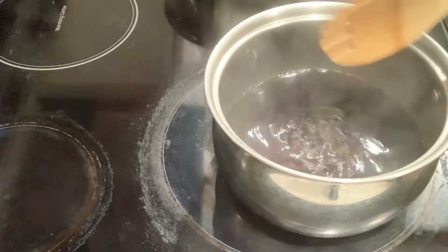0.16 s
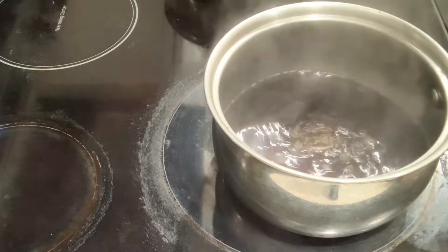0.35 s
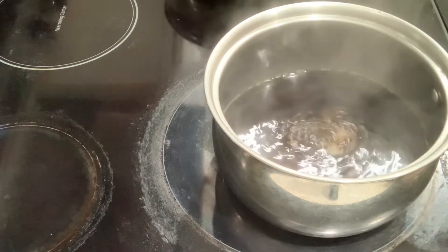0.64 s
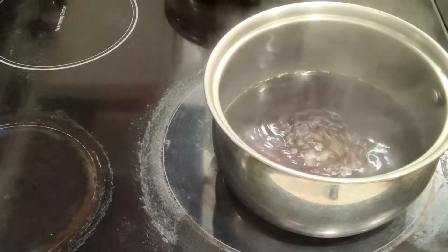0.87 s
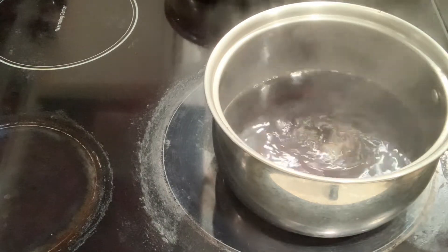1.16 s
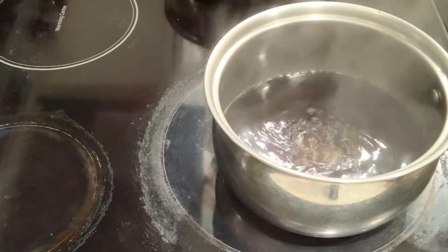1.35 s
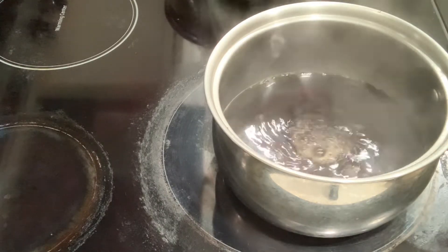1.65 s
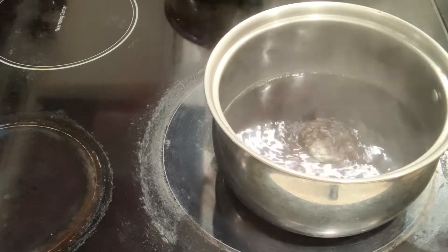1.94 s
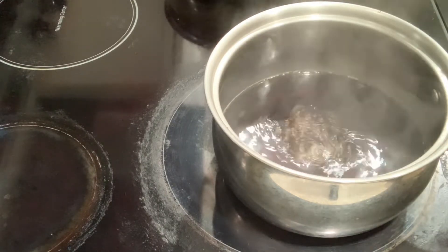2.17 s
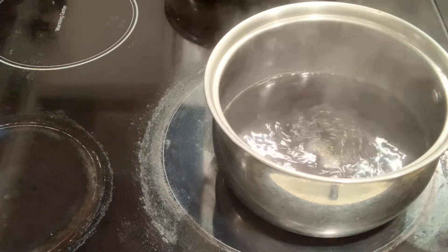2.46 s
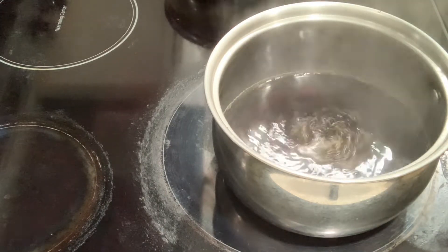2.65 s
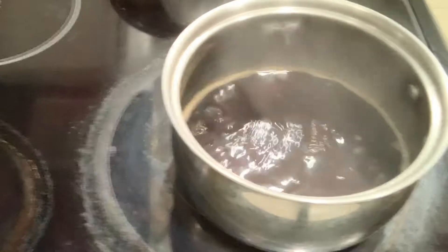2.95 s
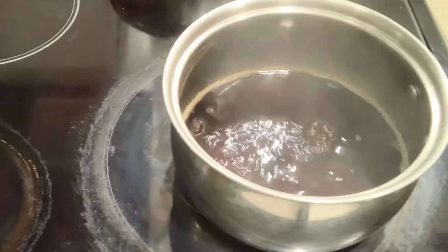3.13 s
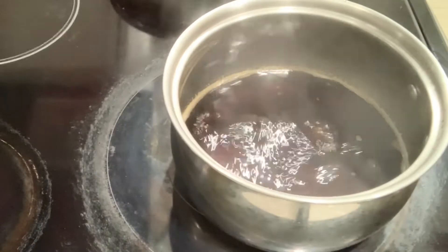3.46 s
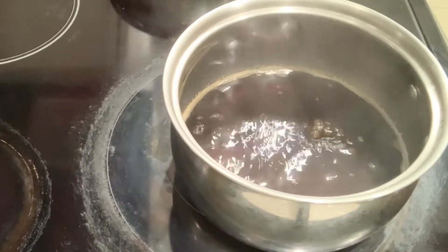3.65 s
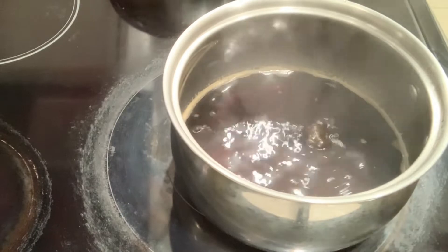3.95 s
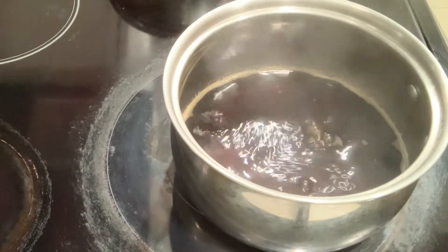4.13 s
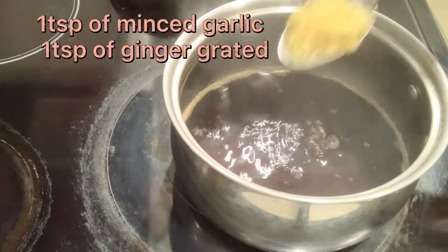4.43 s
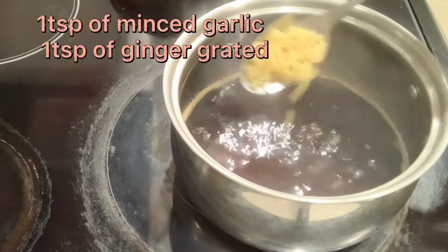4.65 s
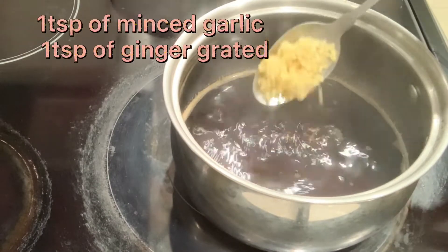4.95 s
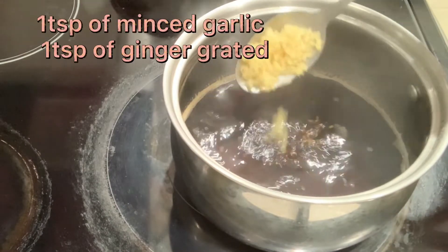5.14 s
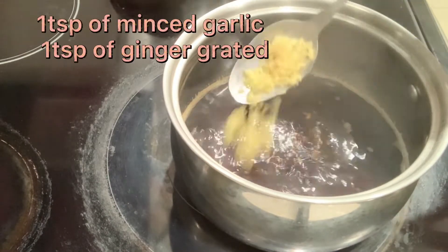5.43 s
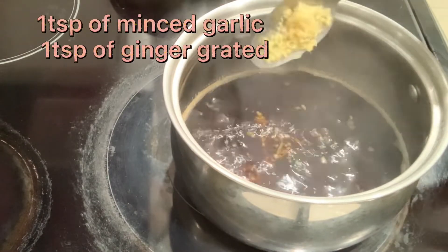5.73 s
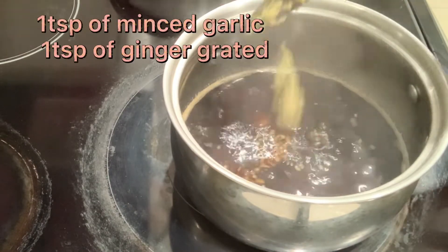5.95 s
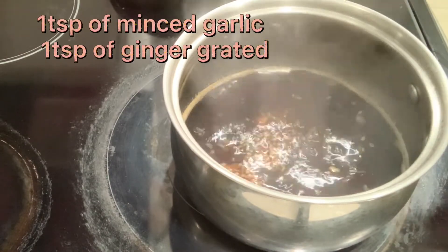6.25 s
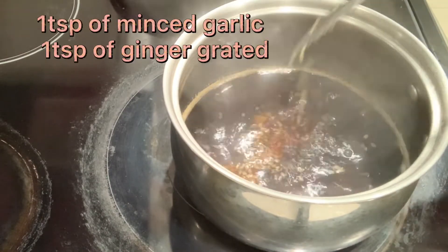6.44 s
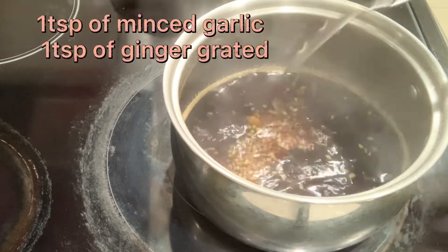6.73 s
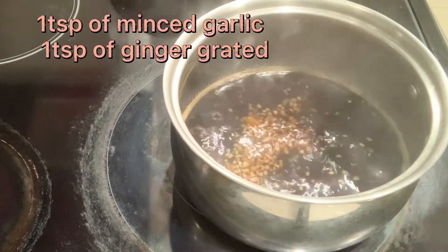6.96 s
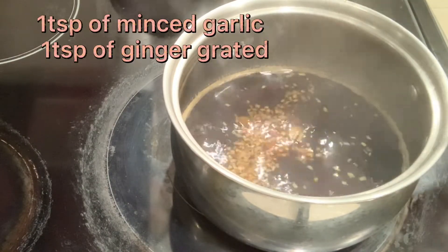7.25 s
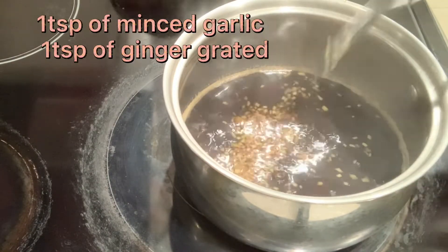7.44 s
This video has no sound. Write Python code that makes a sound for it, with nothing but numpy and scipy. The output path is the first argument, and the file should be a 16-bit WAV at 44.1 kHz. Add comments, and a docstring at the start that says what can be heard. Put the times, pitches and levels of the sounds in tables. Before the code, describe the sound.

In a dry indoor kitchen, a pan simmers close to the microphones, low rumble and hum beneath. Small pops open the scene, then a single thud and a quick cluster of utensil knocks. The sound cuts out for an instant and resumes fuller, with brighter bubbling and a delicate high chirr. Later, portions falling into the hot liquid make sharp ticks, droplet spray and brief hissing bursts.

```python
"""Sauce simmering on a hob

Thin sauce simmers in a steel saucepan while a kitchen fan drones and the mains hums: wavering sines over
coloured noise. Bubbles are ringing clicks, spits are short noise bursts and fizz is a dense swarm of clicks.
A utensil is knocked and set down nearby: struck resonances over a dull thud. After a short silence the same
kitchen returns with louder, recoloured air and a thin chirr, as minced spice drops in from a spoon."""
import sys
import numpy as np
from scipy import signal
from scipy.fft import rfft, irfft, next_fast_len
from scipy.io import wavfile
from scipy.ndimage import uniform_filter1d

SR = 44100
rng = np.random.default_rng(int(sys.argv[2]) if len(sys.argv) > 2 else 0)


def to_wav(sig):
    """Store sig (one row per channel, or 1-D mono) as 16-bit WAV at the path in sys.argv[1].

    Samples outside -1..1 are clipped; the rate is SR.
    """
    pcm = np.clip(np.atleast_2d(sig), -1, 1) * 32767
    pcm = np.round(pcm).astype(np.int16)
    wavfile.write(sys.argv[1], SR, pcm.T)  # frames by channels


N = 335054

# silent gap: (start [s], end [s])
GAP = (2.8507, 2.915)
# kitchen air: (time [s], deep rumble [dB], air rush [dB])
AIR_LEVELS = [(0.0, -51, -60.5), (0.4, -55, -61.5), (1.27, -52.5, -60), (1.6, -56, -62.5),
              (1.85, -53.5, -59.5), (2.84, -56, -61.5), (2.94, -45.5, -52.5), (3.11, -44, -52.5),
              (3.4, -45, -53.5), (4.2, -43.5, -53.5), (6.0, -45, -53), (7.6, -43.5, -53.5)]
# colours of rumble and rush before and after the gap: (frequency [Hz], density [dB per Hz, relative])
RUMBLE_BEFORE = [(13, -61), (22, -34), (41, -8.5), (59, 4.5), (70, 0.5), (85, -8.5), (99, -7.5), (118, 2),
                 (146, -2), (236, -15), (255, -41), (300, -16.5), (390, -43), (660, -120)]
RUMBLE_AFTER = [(13, -76), (22, -37), (27, -34), (30, -11), (39, -12), (59, -0.5), (85, 4.5), (113, -9),
                (124, 1), (146, -11), (194, -7), (221, -27), (249, -38.5), (300, -27), (390, -44),
                (660, -120)]
RUSH_BEFORE = [(130, -3), (220, -4), (361, -4.5), (388, -10), (428, -2), (610, -10.5), (765, -4),
               (907, -23.5), (1110, -13.5), (1240, -22), (1530, -12), (2210, -73), (2450, -24.5),
               (4970, -24), (6500, -33), (8450, -83), (14300, -120)]
RUSH_AFTER = [(130, -26), (220, -2.5), (253, -9.5), (305, 1), (351, -1), (610, -9), (857, -10.5),
              (960, -11.5), (1050, -12.5), (1720, -12), (2210, -17.5), (2450, -22), (2780, -23.5),
              (3480, -23.5), (6500, -36), (8450, -60), (14300, -120)]
# colour of the steady high hiss: (frequency [Hz], density [dB per Hz, relative])
HISS_COLOUR = [(4000, -2), (6000, -2), (8000, -12), (11000, 8.5), (14000, 10), (15600, -11), (15900, 4)]
# level of the steady high hiss: (before the gap [dB], after it [dB])
HISS_LEVELS = (-87.5, -85)
# patchiness of the rush: (spread before the gap [dB], after it [dB])
PATCH_SPREADS = (2.0, 1.1)
# resonances of the pan and the hob around it: (frequency [Hz], width [Hz], gain [dB])
PAN_RESONANCES = [(183, 68, 1.5), (351, 27.2, 3.5), (432.5, 35, 5), (844, 44, 2.5), (918, 47, 9),
                  (1150, 144, 5), (2400, 80, 8), (982, 30, 2), (3500, 40, 6.5), (4980, 33, 10),
                  (6060, 64, 6), (9100, 110, 7.5)]
# thin whine: (frequency [Hz], level before the gap [dB], level after it [dB])
WHINE = [(993, -100, -70.5)]
# fan drone, drifting in pitch and swelling unevenly: (time [s], pitch [Hz], level [dB])
FAN_DRONE = [(0.0, 120.7, -70), (1.37, 121.9, -52.5), (1.6, 118.2, -81), (1.72, 116.2, -47),
             (2.16, 115.8, -56.5), (2.54, 110.2, -52.5), (2.84, 109, -47), (2.94, 109.3, -39.5),
             (3.15, 109.8, -45), (3.8, 111.8, -56), (4.17, 110.5, -42.5), (4.95, 109, -84),
             (5.37, 110, -57), (5.65, 111.8, -39), (5.9, 112.8, -60.5), (6.07, 111, -47), (6.6, 112, -44.5),
             (6.77, 112.8, -73), (6.9, 110.2, -43), (7.3, 110.1, -54), (7.6, 111.3, -44.5)]
# lowest hum, one list before the gap and one after: (time [s], pitch [Hz], level [dB])
LOW_HUM = [
    [(0.0, 59.9, -51.5), (0.88, 59.9, -59.5), (0.92, 59.9, -47), (1.59, 59.9, -55), (1.63, 60.1, -60),
     (1.7, 59.9, -51.5), (1.88, 65.4, -54), (1.97, 63.1, -59), (2.03, 59.9, -44), (2.15, 60.0, -59),
     (2.24, 59.9, -47), (2.85, 59.9, -59)],
    [(2.93, 58.6, -46), (2.98, 58.6, -63), (3.07, 59.9, -55), (4.16, 59.9, -44), (6.48, 59.9, -46),
     (6.58, 59.9, -58), (6.76, 60.0, -40.5), (6.87, 59.9, -54), (6.91, 59.9, -44.5), (7.27, 59.9, -46),
     (7.39, 60.0, -45), (7.6, 58.7, -56)],
]
# narrow bands of the chirr: (frequency [Hz], width [Hz], gain [dB])
CHIRR_BANDS = [(7120, 650, 3.5), (9000, 52, 2), (9500, 600, -2), (10046, 360, 3.5), (10440, 190, -0.5)]
# utensil knocks: (time [s], first blow over rattle [dB], thud [dB], ringing [dB], rattle rise [s],
# rattle length [s], fall by 60 dB [s], upper band edge [Hz], longest ring when held [s])
KNOCKS = [(1.034, 26.5, -45, -72.5, .001, 0.0074, 0.17, 1870, 0.025),
          (1.243, 13.5, -50, -61, .007, 0.012, 0.13, 4700, 0.5),
          (1.2605, 25, -59, -70, 0.0011, 0.007, 0.16, 4700, .3),
          (1.283, 22, -49.5, -67.5, 0.0018, 0.018, 0.1, 4500, 0.3),
          (1.315, 10, -52.5, -79, 0.0023, .025, 0.5, 4160, .03)]
# ringing modes of the utensil: (frequency [Hz], level [dB], 60 dB decay [s])
UTENSIL_MODES = [(193, 0, 0.081), (333, -6, 0.04), (454, -12, 0.27), (548, -8.5, 0.053), (895, -3, 0.05),
                 (1013, -1, 0.03), (1207, -8, 0.045), (1370, -5, 0.04), (1537, -3.5, 0.065),
                 (1460, -35, 0.54), (1613, -8, 0.03), (2063, -10, 0.022), (2340, -11, 0.02),
                 (2630, -8.5, 0.019), (3310, -5, 0.03), (3800, -21, .018), (4460, -18, 0.025)]
# levels of the knocks by path: (direct [dB], scattered [dB])
KNOCK_PATHS = (-7.5, -2.5)
# steady surface fizz: (time [s], fine fizz [dB], coarse fizz [dB])
FIZZ_LEVELS = [(0.0, -79.5, -71), (1.0, -79.5, -68.5), (2.84, -80.5, -77.5), (2.92, -79, -65),
               (5.0, -79.5, -69), (7.6, -82.5, -71.5)]
# colours of fine fizz, coarse fizz and splashes: (frequency [Hz], density [dB per Hz, relative])
FINE_COLOUR = [(3000, -32), (5000, -22), (7000, -26), (8500, 3.5), (10500, 9), (12500, 0.5), (14300, 8),
               (15650, -25), (15950, -14)]
COARSE_COLOUR = [(700, -3.5), (1400, 4.5), (2500, 3.5), (5000, -1), (7000, -2.5), (10000, -48),
                 (16000, -39)]
SPLASH_COLOUR = [(2800, -30), (4000, 4.5), (5500, 2.5), (7000, 5.5), (8500, -13)]
# flare-ups where drops and spice meet the sauce: (time [s], rise [s], hold [s], fall [dB per s],
# fine fizz [dB], coarse fizz [dB], splash [dB])
FLARES = [(0.009, 0.0033, 0.021, 214, -75, -62.5, -77), (0.756, 0.027, 0.0091, 148, -64, -58, -65.5),
          (1.014, .006, 0.0034, 359, -104, -105, -92), (1.588, 0.0058, 0.0066, 364, -79, -80, -81),
          (2.787, 0.0097, 0.016, 360, -83, -88, -84), (4.742, 0.0069, 0.032, 364, -69, -70, -75),
          (4.815, 0.018, 0.013, 364, -74, -70, -82), (5.025, 0.0055, 0.0071, 364, -71, -78, -88),
          (5.45, 0.027, 0.013, 364, -63.5, -80, -69), (5.858, 0.0067, 0.009, 364, -72, -80, -83),
          (5.947, 0.0022, 0.028, 402, -63, -88, -62.5), (6.345, 0.003, 0.021, 402, -59, -62, -69),
          (6.694, .006, 0.0087, 364, -89, -91, -90)]
# spitting sauce: (time [s], peak before band filter [dB], lowest [Hz], highest [Hz])
TICKS = [(5.9495, -31.5, 3500, 20000), (6.6, -59, 3500, 8000), (6.2924, -40.5, 3500, 7100),
         (6.336, -49, 9000, 17400), (4.8, -43, 2100, 10000), (7.1, -51, 3000, 6100),
         (6.369, -53, 4000, 15000), (5.0395, -39, 2200, 4300), (4.7025, -35, 2200, 7900),
         (4.2, -42.5, 3000, 8000), (3.7, -44, 2700, 4600), (1.341, -41, 4200, 6500), (4.6, -48, 2800, 8800)]
# bursting bubbles at set times, loud and faint: (time [s], ring peak [dB], pitch [Hz],
# spray before band filter [dB])
TIMED_POPS = [(0.03, -44, 4440, -60), (0.0295, -44.5, 1870, -78), (0.037, -46, 2230, -75),
              (0.038, -42, 4200, -70), (0.047, -43, 2040, -75), (0.054, -41, 4300, -65),
              (0.069, -46, 2050, -75), (0.098, -48, 3870, -55), (0.331, -52, 3840, -59),
              (0.5566, -48, 3830, -56), (0.68, -54, 5930, -47), (0.165, -70, 5000, -73),
              (0.255, -70, 5000, -71), (0.629, -59, 5000, -53), (0.692, -65, 5000, -55),
              (0.781, -47, 5100, -62), (0.788, -41, 5360, -60), (0.796, -47, 5600, -65),
              (0.781, -48, 2100, -75), (0.8, -42.5, 1400, -75), (0.815, -49, 1380, -75),
              (1.0185, -49, 4000, -53), (1.341, -45, 5430, -84), (1.6075, -51, 4930, -53),
              (1.8893, -63, 4000, -50.5), (1.9101, -59, 3860, -55), (1.973, -53.5, 3980, -57),
              (2.0, -55, 3300, -75), (2.0817, -48, 6060, -55), (2.116, -50, 3500, -75),
              (2.355, -48.5, 2850, -75), (2.432, -53, 3740, -75), (2.458, -51, 3400, -75),
              (2.812, -49, 3400, -77), (2.588, -64, 5120, -53), (2.6341, -68, 4010, -50.5),
              (2.7725, -54, 5024, -55), (2.796, -54, 4800, -52), (3.1532, -41, 4840, -53),
              (3.6366, -41, 4880, -57), (3.6801, -46, 3770, -53), (4.2804, -41, 5850, -65),
              (4.703, -48, 3200, -49), (4.7516, -57, 3960, -41.5), (4.767, -42, 5860, -51),
              (4.816, -43, 4000, -70), (4.8574, -43.5, 4020, -65), (4.8615, -60, 4020, -46),
              (4.826, -64, 4000, -58), (5.0345, -59, 4000, -46.5), (5.0388, -39, 3030, -50),
              (5.047, -62, 4000, -58), (5.1372, -45, 6200, -66), (5.469, -44, 5590, -53),
              (5.869, -60, 3710, -51), (5.9494, -42, 4844, -37), (5.9529, -43, 5653, -46),
              (5.981, -41, 5000, -56), (6.0911, -49, 4015, -71), (6.29, -58, 3623, -74),
              (6.3543, -33, 5050, -39), (6.368, -60, 5060, -34.5), (6.4028, -45, 6390, -64),
              (6.573, -57, 3944, -58), (6.703, -60, 4300, -57), (7.3422, -66, 3625, -58),
              (7.3744, -56, 4304, -59), (7.481, -58, 4290, -50)]
# random smaller bursts: (ring peak [dB], spray [dB], spread either way [dB], lowest [Hz], highest [Hz])
SMALL_POPS = (-53.5, -69.5, 3.5, 2310, 5502)
# microphone pair: (frequency [Hz], share heard alike [0-1], lag of left [radians], left over right [dB])
MIC_PAIR = [(30.5, .99, 0.6, 3), (66, 1, -0.5, -1), (120.6, 1, 0, 5), (273, 0.5, 0, -0.5),
            (440, 0.3, .8, 0), (650, .3, 2.3, 0), (874, 0.3, 2.8, 0), (1800, 0.27, 3, 1.5),
            (2470, 0.17, 5, 1), (5700, 0.17, 8, 1.2), (6710, 0.98, 8, 2.5), (8000, 1, 9.5, -4),
            (9040, 1, 9.5, 2.5), (10330, 0.62, 11, -1), (11050, 0.88, 13.2, .3), (12400, 1, 12.2, 0),
            (14200, 0.85, 13.8, -0.5)]

WHINE_WAVER_DB = 1.5
CHIRR_START_S, CHIRR_GAP_S, CHIRR_SLOWING_S = 2.93, .104, 0.000368  # slowing: added to each gap
CHIRR_DB, CHIRR_FADE_DB_PER_S = -65, 2.5
CHIRR_SPREAD_DB, CHIRR_JITTER_S = 1.5, .004
GRIP_DETUNE = .01  # each blow finds the rings at slightly other pitches (share of the pitch)
TICK_S, SPRAY_S = 0.0037, 0.011  # time to fall 60 dB
POP_CYCLES, SMALL_POP_CYCLES = 16.7, 31  # cycles to fall 60 dB; the random bursts ring on
SMALL_POPS_BEFORE_DB = -7  # added to their ring before the gap
ROOM_T60_S = 0.069
CUTOFF_HZ = 16500

T = np.arange(N) / SR
AFTER = T > GAP[1]
SIZE = next_fast_len(N + SR)
HZ = np.maximum(np.arange(SIZE // 2 + 1) * SR / SIZE, 1)


def amp(db):
    """Decibels to gain."""
    return 10 ** (np.asarray(db) / 20)


def rms_one(x):
    """Scale to rms 1."""
    return x / np.sqrt(np.mean(x ** 2) + 1e-20)


def in_time(rows):
    """Columns of a curve table at every sample."""
    s, *columns = np.transpose(rows)
    return [np.interp(T, s, c) for c in columns]


def over_hz(rows):
    """Columns of a frequency table at every spectral line, on a log frequency axis."""
    hz, *columns = np.transpose(rows)
    return [np.interp(np.log(HZ), np.log(hz), c) for c in columns]


def colour_gain(rows):
    """Gain of a colour table at every spectral line."""
    return amp(over_hz(rows)[0])


def coloured(x, gain):
    """Filter by a gain for each spectral line."""
    return irfft(rfft(x, SIZE) * gain, SIZE)[..., :N]


def band(x, order, low_hz, high_hz):
    """Keep one band of frequencies."""
    return signal.sosfilt(signal.butter(order, [low_hz, high_hz], "band", fs=SR, output="sos"), x)


def drift(rate):
    """Slow random wander of spread 1: noise smoothed by a double pole at the rate in Hz."""
    r = np.exp(-80 * np.pi * rate / SR)  # runs at one point per 40 samples
    noise = rng.standard_normal(N // 40 + 2002)
    slow = signal.lfilter([1], [1, -2 * r, r * r], noise)[2000:]  # drop the settling
    return np.interp(np.arange(N) / 40, np.arange(len(slow)), rms_one(slow))


def ring(clicks, hz, t60):
    """A two-pole resonator: each unit click starts a sine decaying from about height 1."""
    r, w = amp(-60 / (t60 * SR)), 2 * np.pi * hz / SR
    return signal.lfilter([0, np.sin(w)], [1, -2 * r * np.cos(w), r * r], clicks + 1e-18)


def grains(per_s, spread_db, shape=N):
    """Random clicks of either sign, most small and a few large."""
    sizes = amp(spread_db * np.minimum(rng.exponential(1, shape), 5))
    signs = rng.choice([-1, 1], shape)
    return sizes * signs * (rng.random(shape) < per_s / SR)


def hollows():
    """Pan and hob resonances multiply into one gain for every spectral line."""
    peaks = [amp(db / (1 + (2 * (HZ - hz) / width) ** 2)) for hz, width, db in PAN_RESONANCES]
    return np.prod(peaks, axis=0)


def two_colours(x, before, after, extra=1):
    """One colour before the gap, another after; each is levelled to rms 1 over the whole length."""
    first, second = (rms_one(coloured(x, extra * colour_gain(c))) for c in (before, after))
    return np.where(AFTER, second, first)


def patchy(x, depth_db, rate):
    """Eddies: overlapping half-octave bands swell and sink each at its own pace."""
    place = 2 * np.log2(np.clip(HZ, 250, 8000) / 250)  # half octaves above 250 Hz
    spectrum = rfft(x, SIZE)
    out = 0
    for k in range(11):
        weight = np.maximum(1 - np.abs(place - k), 0)
        out = out + amp(depth_db * drift(rate)) * irfft(spectrum * weight, SIZE)[..., :N]
    return out


def kitchen_air():
    """Turbulent rumble, a rush of air with the simmer's patter in it, and a steady high hiss; three paths."""
    rumble_db, rush_db = in_time(AIR_LEVELS)
    white = rng.standard_normal((3, N))
    rumble = amp(rumble_db) * two_colours(white, RUMBLE_BEFORE, RUMBLE_AFTER)
    patter = rms_one(grains(per_s=2500, spread_db=4.0, shape=(3, N)))
    # the noise is reversed in time so that rush and rumble do not move together
    rush = two_colours(white[:, ::-1] + 0.51 * patter, RUSH_BEFORE, RUSH_AFTER, hollows())
    rush = patchy(rush, depth_db=np.where(AFTER, PATCH_SPREADS[1], PATCH_SPREADS[0]), rate=4.3)
    rush = amp(rush_db + 0.51 * drift(13.0)) * rush
    hiss = rms_one(coloured(white, hollows() * colour_gain(HISS_COLOUR)))
    hiss = hiss * amp(np.where(AFTER, HISS_LEVELS[1], HISS_LEVELS[0]))
    return rumble + rush + hiss


def hum():
    """A thin whine, the wavering low hum and the drone of the fan: sines of changing level and pitch."""
    out = np.zeros(N)
    for hz, before_db, after_db in WHINE:
        level_db = np.where(AFTER, after_db, before_db) + WHINE_WAVER_DB * drift(7.3)
        out += amp(level_db) * np.sin(2 * np.pi * hz * T)
    for hz, db in (in_time(FAN_DRONE), in_time([*LOW_HUM[0], *LOW_HUM[1]])):
        out += amp(db) * np.sin(2 * np.pi * np.cumsum(hz) / SR)
    return np.sqrt(2) * out  # table levels are rms


def chirr(rise_s=0.008, count=42):
    """A thin high chirr, about ten soft noise puffs a second in narrow bands, slowing and fading."""
    k = np.arange(count)
    late, strong = rng.standard_normal((count, 2)).T
    s = CHIRR_START_S + CHIRR_GAP_S * k + CHIRR_SLOWING_S * k * k / 2 + CHIRR_JITTER_S * late
    ages = np.maximum(T - s[:, None], 0) / rise_s
    levels_db = CHIRR_DB - CHIRR_FADE_DB_PER_S * (s - s[0]) + CHIRR_SPREAD_DB * strong
    puffs = amp(levels_db) @ (ages * np.exp(1 - ages))
    bands = sum(amp(db) / (1 + (2 * (HZ - hz) / width) ** 2) for hz, width, db in CHIRR_BANDS)
    return puffs * rms_one(coloured(rng.standard_normal(N), bands))


def knocks():
    """A first blow, then a short rattle of uneven contacts: a dull thud and the ringing utensil."""
    out, age = np.zeros(N), np.arange(SR) / SR
    for s, strike_db, thud_db, ring_db, rise, length, fading, bright_hz, longest in KNOCKS:
        fall_db = -60 * np.maximum(age - rise - length, 0) / fading
        shake = np.minimum(age / rise, 1) * amp(np.maximum(fall_db, -200))
        contacts = rms_one(grains(per_s=2500, spread_db=2.0, shape=SR)) * shake
        contacts[0] += amp(strike_db)
        knock = amp(thud_db) * signal.lfilter([.45], [1, -.9], contacts)
        for hz, db, t60 in UTENSIL_MODES:
            pitch = hz * (1 + GRIP_DETUNE * rng.standard_normal())
            knock += amp(ring_db + db) * ring(contacts, pitch, min(t60, longest))
        out[round(s * SR):][:SR] += band(knock, 3, 90, bright_hz)
    return out


def gurgle(per_s, cycles, below_rush_db, low_hz, high_hz, dull):
    """Vapour bubbles leave the pan bottom in clumps, each ringing for a set count of cycles."""
    born = grains(per_s * amp(2.5 * drift(6)), spread_db=2.2)
    pitches = np.geomspace(low_hz, high_hz, 20)
    dealt = rng.integers(0, len(pitches), N)  # which pitch each bubble gets
    rings = sum(ring(born * (dealt == k), hz, cycles / hz) for k, hz in enumerate(pitches))
    dulled = signal.lfilter([.1], [1, -dull], rings)
    return amp(in_time(AIR_LEVELS)[1] + below_rush_db) * rms_one(dulled)


def fizz():
    """Thousands of tiny bubbles a second merge into a clumpy, grainy hiss with flare-ups; three paths."""
    swarm = grains(per_s=9000 * amp(3.0 * drift(40)), spread_db=4.0, shape=(3, N))
    gains = np.vstack([amp(in_time(FIZZ_LEVELS)), np.zeros(N)])  # splashes come only with flares
    for s, rise, hold, fall_db, *levels_db in FLARES:
        fall = amp(-fall_db * np.clip(T - s - rise - hold, 0, .5))
        gains += amp(levels_db)[:, None] * np.clip((T - s) / rise, 0, 1) * fall
    out = 0
    for gain, colour in zip(gains, (FINE_COLOUR, COARSE_COLOUR, SPLASH_COLOUR)):
        out = out + gain * rms_one(coloured(swarm, hollows() * colour_gain(colour)))
    return out


def ticks():
    """Spitting sauce: a sharp click with a very short noisy tail, inside its band."""
    out, t = np.zeros(N), np.arange(500) / SR
    for s, db, low_hz, high_hz in TICKS:
        noise = rng.standard_normal(len(t))
        burst = (noise + 2 * (t == 0)) * amp(db - 60 * t / TICK_S)
        out[round(s * SR):][:len(t)] += band(burst, 2, low_hz, high_hz)
    return out


def small_pops(count):
    """Rows like those of the timed bursts, at random moments, sizes and pitches."""
    peak_db, spray_db, spread_db, low_hz, high_hz = SMALL_POPS
    when, pitch, ping, spray = rng.random((count, 4)).T
    s = when * T[-1]
    ping_db = peak_db + SMALL_POPS_BEFORE_DB * (s < GAP[0]) + spread_db * (2 * ping - 1)
    hz = low_hz * (high_hz / low_hz) ** pitch
    return list(zip(s, ping_db, hz, spray_db + spread_db * (2 * spray - 1)))


def pops():
    """Each bubble burst is a decaying sine with a short bright noise spray of droplets."""
    size = 2000
    out, t = np.zeros(N + size), np.arange(size) / SR
    rows = [(*row, POP_CYCLES) for row in TIMED_POPS]
    rows += [(*row, SMALL_POP_CYCLES) for row in small_pops(count=150)]
    sprays = band(rng.standard_normal((len(rows), size)), 3, 6500, 15000)
    for (s, db, hz, spray_db, cycles), spray in zip(rows, sprays):
        ping = np.sin(2 * np.pi * hz * t) * amp(db - 60 * t * hz / cycles)
        i = round(s * SR)
        out[i:i + size] += ping + amp(spray_db - 60 * t / SPRAY_S) * spray
    return out[:N]


def walls(x):
    """A short scattered tail for each side: decaying noise, even in colour on average."""
    t = np.arange(SR // 2) / SR
    tails = rfft(rng.standard_normal((2, len(t))) * amp(-60 * t / ROOM_T60_S), SIZE)
    return coloured(x, tails / np.sqrt(uniform_filter1d(np.abs(tails) ** 2, size=500)))


def microphones(shared, scattered):
    """Both hear a shared part, phase-shifted by their spacing, and each its own scattered part."""
    share, lag, pan_db = over_hz(MIC_PAIR)
    share = np.clip(share, 0, 1)
    side = np.array([[1], [-1]])  # left, right
    pan = amp(side * pan_db / 2)
    alike = coloured(shared, pan * np.sqrt(share) * np.exp(-.5j * side * lag))
    return alike + coloured(scattered, pan * np.sqrt(1 - share))


def scene():
    """Hum and direct knocks are common to both sides; everything else also arrives scattered."""
    wide = kitchen_air() + fizz()
    low_gurgle = gurgle(per_s=140, cycles=10.4, below_rush_db=-6, low_hz=126, high_hz=630, dull=0.924)
    high_gurgle = gurgle(per_s=450, cycles=40.0, below_rush_db=-12, low_hz=895, high_hz=4225, dull=0.65)
    near = low_gurgle + AFTER * high_gurgle + pops() + ticks() + chirr()
    knock = knocks()
    common = hum() + knock * amp(KNOCK_PATHS[0])
    scattered = wide[1:] + walls(near + amp(KNOCK_PATHS[1]) * knock)
    return microphones(wide[0] + near, scattered) + common * amp([[1.2], [-1.2]])  # leans left


def record(dry):
    """An abrupt stop, silence, a quick fade back in; a steep low-pass removes the top."""
    gate = np.where(AFTER, np.clip((T - GAP[1]) / 0.0047, 0, 1), T < GAP[0])
    return signal.sosfilt(signal.cheby2(18, 60, CUTOFF_HZ, fs=SR, output="sos"), dry * gate)


dry = scene()
out = record(dry)
to_wav(out)
```